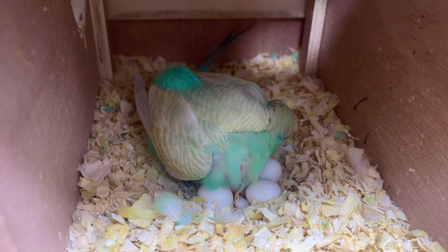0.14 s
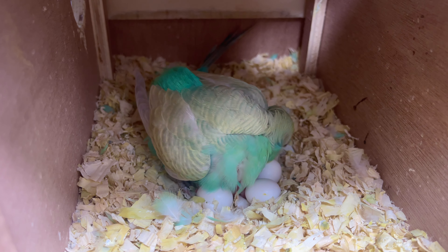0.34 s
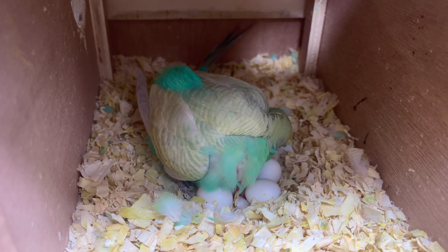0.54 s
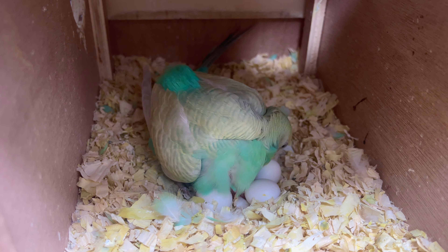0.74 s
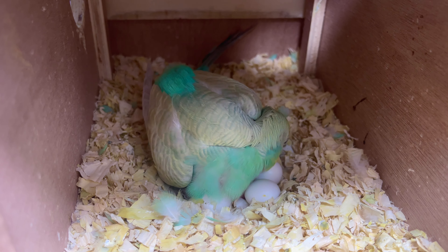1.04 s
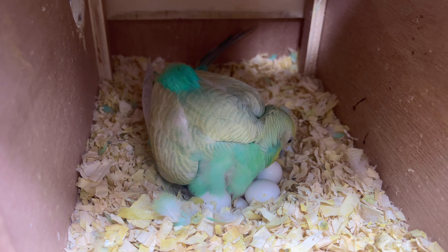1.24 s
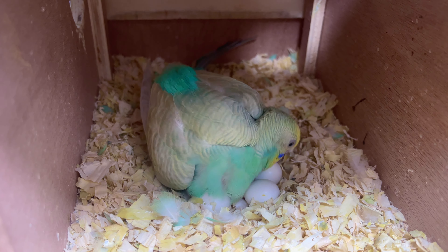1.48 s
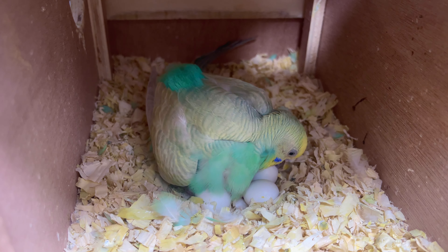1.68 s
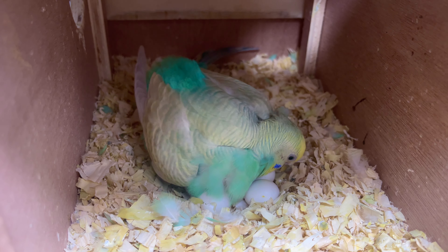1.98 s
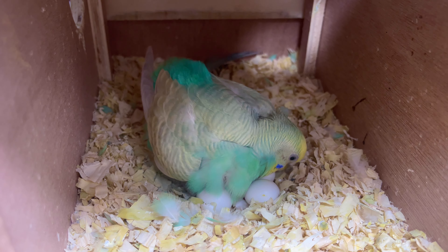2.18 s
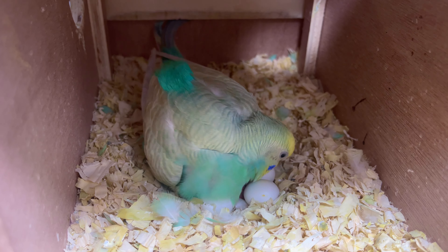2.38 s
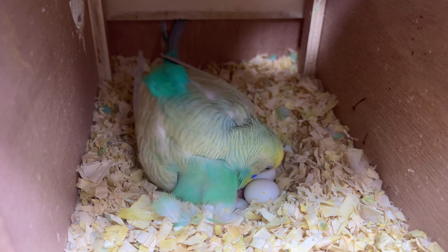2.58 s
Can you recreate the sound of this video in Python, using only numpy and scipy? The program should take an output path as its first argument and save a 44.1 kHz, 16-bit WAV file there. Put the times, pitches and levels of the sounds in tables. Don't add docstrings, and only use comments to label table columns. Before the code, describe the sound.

A small parrot gives about ten short, harsh, raspy squawks inside a wooden nest box, over low rumbling and rustling shavings; faint hatchling peeps open and close, while another bird chirps and whistles further off, miked closely in stereo.

```python
import sys
import numpy as np
from scipy import signal
from scipy.fft import rfft, irfft, next_fast_len
from scipy.io import wavfile
from scipy.ndimage import uniform_filter1d, map_coordinates

SR = 44100
rng = np.random.default_rng(int(sys.argv[2]) if len(sys.argv) > 2 else 0)


def log_audio(samples):
    frames = np.atleast_2d(samples).T
    limited = np.clip(frames, -1, 1)
    pcm = np.round(limited * 32767).astype(np.int16)
    wavfile.write(sys.argv[1], SR, pcm)


def convert_level_to_amplitude(level_db):
    exponent = np.asarray(level_db, float) / 20
    return 10 ** exponent


N = 119070

# f/Hz, level/dB
AIR_COLOUR = [(59, -30), (100, 0), (531, -4), (651, -15), (798, -6.5), (1800, -26), (2040, -33),
              (12000, -9.5), (13000, -75)]
# t/s, pitch f/Hz, level/dB
PEEPS = [
    [(.012, 4110, -40), (.024, 4200, -46), (.047, 3442, -52), (.08, 5710, -47.5), (.104, 4440, -45),
     (.11, 4500, -48), (.128, 5450, -53.5), (.137, 4500, -44.5), (.157, 5750, -48), (.176, 4465, -32.5),
     (.181, 4400, -56)],
    [(.915, 4500, -55), (.94, 5150, -42.5), (.968, 4200, -51)],
    [(1.708, 4000, -65.5), (1.72, 4000, -48), (1.735, 3470, -51), (1.775, 5260, -44)],
    [(2.54, 3750, -50), (2.558, 3900, -46), (2.578, 4500, -45.5), (2.598, 5350, -44.5), (2.62, 4640, -42),
     (2.638, 4200, -53), (2.655, 4510, -48), (2.675, 5740, -43.5), (2.71, 4040, -45)],
]
# f/Hz, level/dB
CHICK_BEAK = [(3400, -2), (4300, -12), (5300, -2), (7000, -8), (8800, -3), (10000, -13), (11300, -5)]
# t/s, level/dB
RUMBLE_LEVELS = [(0, -66), (.1, -64), (.14, -46), (.27, -41), (.47, -47), (.63, -38), (.9, -41), (1.13, -49),
                 (1.3, -43), (1.335, -70), (1.76, -72), (1.81, -47), (1.95, -41), (2.1, -40), (2.16, -58),
                 (2.3, -49), (2.41, -58), (2.44, -74)]
# f/Hz, level/dB
RUMBLE_COLOUR = [(20, -63), (40, -2.5), (80, 1.5), (197, -11.5), (378, -20), (486, -14.5), (625, -26),
                 (777, -16.5), (1200, -58), (1560, -71), (2640, -120)]
THUMP_TIMES = [.826, 1.225, 2.253, .72]
# level/dB, f/Hz, time to fade by 60 dB t/s
THUMPS = [(-4.5, 122, 0.011), (-24.5, 74.7, 0.17), (-15.5, 108, 0.047), (-31, 56.7, 0.32)]
# t/s, level/dB
RUSTLE = [(0, -81), (.12, -86), (.17, -55), (.77, -46), (1.2, -52.5), (1.42, -49), (1.56, -56), (1.78, -64),
          (1.94, -40.5), (2.04, -45), (2.14, -59.5), (2.26, -37), (2.4, -50), (2.5, -49), (2.7, -55)]
# f/Hz, level/dB
SHAVINGS = [(150, -58), (350, -2.5), (900, -15.5), (1100, -4), (2000, 0), (3500, 0), (6000, -2),
            (12000, -16.5)]
# start t/s, length t/s, level/dB, low throat f/Hz, high throat f/Hz
SQUAWKS = [
    (0.196, 0.11, -21.5, 3900, 6800),
    (0.376, 0.13, -21.5, 3700, 6450),
    (0.564, 0.13, -21, 3830, 6570),
    (0.772, .13, -26.5, 3160, 5900),
    (1.028, 0.14, -19.5, 3570, 6470),
    (1.251, 0.11, -19.5, 3800, 6260),
    (1.474, 0.093, -24.5, 4240, 6200),
    (1.773, 0.089, -20.5, 4330, 6330),
    (2.164, 0.093, -21.5, 4000, 6000),
    (2.346, 0.098, -20.5, 3560, 6430),
]
CHEST_LEVELS = [-17, -27.5, -16, -35, -15, -39, -36, -17, -3, -12]
LOW_LEVELS = [-0.5, 5.5, 1, 3.5, 3.5, 3, -1, -3.5, 0, -5]
# f/Hz, level/dB, open-beak hiss level/dB
MIDDLE_THROAT = [(5900, 9, -3.5), (5150, 3.5, -4), (4760, -3, -4.5), (3900, -17, -7), (5130, 7, -3),
                 (4400, -16, -1.5), (5480, 2, -2.5), (5150, 1, -2.5), (5000, 3.5, -4.5), (4950, 5, -2.5)]
# f/Hz, level/dB
PARROT_BEAK = [(700, -41.5), (1300, -18.5), (3000, -9), (6300, -7.5), (7600, -13), (9000, -15),
               (11800, -7.5), (15500, -22.5)]
# t/s, pitch f/Hz, level/dB
CHIRPS = [
    [(.495, 1270, -47), (.54, 1300, -46), (.595, 1340, -46)],
    [(1.008, 1280, -49), (1.018, 1250, -46), (1.03, 1240, -50)],
    [(1.21, 2450, -46), (1.225, 2250, -38), (1.255, 2500, -46)],
    [(1.365, 2750, -48), (1.39, 2800, -39), (1.415, 2550, -50)],
    [(.355, 1300, -55), (.375, 1300, -51), (.39, 1500, -55)],
    [(1.458, 1850, -55), (1.468, 1500, -50), (1.482, 1480, -54)],
]
# t/s, pitch f/Hz, level/dB
WHISTLES = [
    [(2.418, 1772, -41), (2.438, 1433, -38), (2.47, 1965, -51), (2.51, 2177, -51.5), (2.565, 2710, -40),
     (2.61, 1538, -46.5)],
    [(2.58, 4420, -45), (2.598, 3620, -49), (2.612, 3340, -47.5)],
    [(2.665, 1720, -64), (2.68, 1600, -50), (2.71, 1550, -46)],
]
# t/s, pitch f/Hz, level/dB
CHATTER = [(1.183, 3290, -46), (1.192, 2640, -41.5), (2.256, 2794, -39), (2.272, 2620, -41),
           (2.278, 1700, -43), (2.29, 2790, -47), (2.295, 3570, -44.5), (2.311, 2150, -41),
           (2.32, 1298, -42), (2.333, 1328, -47), (2.333, 2650, -44), (2.352, 1770, -46.5),
           (2.377, 1773, -37.5), (2.395, 1772, -42.5)]
# f/Hz, level/dB, time to fade by 60 dB t/s
WALL = [(410, -11.5, 0.041), (872, 7.5, 0.026), (1280, -5.5, 0.028), (1600, -2.5, 0.018)]
# f/Hz, level/dB, time to fade by 60 dB t/s
SHELL = [(749, -5, .02), (1240, -6, 0.013), (1800, -2, 0.0059), (4000, -46, 0.0054)]
# f/Hz, level/dB, time to fade by 60 dB t/s
PANEL = [(390, 6.5, 0.034), (469, -14.5, 0.22), (863, -4, 0.1)]
# f/Hz, level/dB, time to fade by 60 dB t/s
SNAP = [(4950, -8, .016), (5900, -16, .012)]
# t/s, level/dB, what rings
TAPS = [
    (1.4452, -25.5, PANEL),
    (2.415, -42.5, PANEL),
    (2.475, -47, PANEL),
    (2.556, -47.5, PANEL),
    (1.9608, -21, SNAP),
    (1.9817, -16, SNAP),
    (2.0127, -18.5, SNAP),
]
# t/s, length t/s, level/dB
SCRATCHES = [
    (1.95, .09, -52),
    (1.005, .03, -58),
]
# f/Hz, time to fade by 60 dB t/s
ROOM = [(200, 0.57), (2000, 0.23), (6000, 0.19), (12000, 0.11)]
# f/Hz, level/dB
APART = [(300, -6), (1500, 0), (3000, 2.5), (6200, -2.5), (9000, 3), (12500, 2)]
# f/Hz, width f/Hz, depth level/dB
TREBLE_DIPS = [(10200, 300, 30), (13800, 600, 45), (15300, 1500, 9)]


def unit(x):
    return x / np.sqrt(np.mean(x ** 2) + 1e-20)


def along(points, hz):
    f, v = np.transpose(points)
    return np.interp(np.log(hz + 1), np.log(f + 1), v)


def wobble(rate, size):
    knots = rng.standard_normal(int(size * rate / SR) + 4)
    return map_coordinates(knots, [np.arange(size) * rate / SR])


def filtered(x, response):
    m = next_fast_len(x.shape[-1] + 8192)
    return irfft(rfft(x, m) * response(np.fft.rfftfreq(m, 1 / SR)), m)[..., :x.shape[-1]]


def add(track, s, sound):
    part = track[max(round(s * SR), 0):][:len(sound)]
    part += sound[:len(part)]


def ring(modes, t):
    return sum(convert_level_to_amplitude(db - 60 * t / t60) * np.sin(2 * np.pi * hz * t) for hz, db, t60 in modes)


def space(x, box_db, room_db):
    hz, t, z = signal.stft(rng.standard_normal((2, SR // 2)), SR, nperseg=256)
    room = signal.istft(z * convert_level_to_amplitude(-60 * t / along(ROOM, hz)[:, None]), SR, nperseg=256)[1]
    box_t60 = .015
    box = rng.standard_normal(room.shape) * convert_level_to_amplitude(-60 * np.arange(room.shape[1]) / SR / box_t60)
    answer = convert_level_to_amplitude(room_db) * room / np.linalg.norm(room[0])
    answer += convert_level_to_amplitude([[box_db], [0]]) * box / np.linalg.norm(box[0])
    answer[0, 0] += 1
    power = uniform_filter1d(abs(rfft(answer)) ** 2, size=300)

    def spread(f):
        even = np.array([np.interp(f, np.linspace(0, SR / 2, len(p)), p ** -.5) for p in power])
        return even * [f * 0 + 1, convert_level_to_amplitude(along(APART, f))]

    wet = signal.fftconvolve(x[None], answer, axes=1)[:, :N]
    mid, side = filtered(wet, spread)
    m, d = rfft([mid, side])
    shared = uniform_filter1d((d * m.conj()).real, size=1500)
    lean = shared / (uniform_filter1d(abs(m) ** 2, size=1500) + 1e-12)
    side = side - irfft(lean * m, N)
    return np.array([mid + side, mid - side])


def still_air():
    noise = rng.standard_normal((2, N))
    return convert_level_to_amplitude(-56) * unit(filtered(noise, lambda f: convert_level_to_amplitude(along(AIR_COLOUR, f)) * (f > 60)))


def song(notes, colour, flutter_db, waver, hiss_db, count):
    out = np.zeros(N)
    for note in notes:
        s, hz, db = np.transpose(note)
        t = np.arange(s[0], s[-1], 1 / SR)
        step = np.interp(t, s, np.arange(len(s)))
        eased = np.floor(step) + np.sin(np.pi / 2 * (step % 1)) ** 2
        pitch = np.interp(eased, np.arange(len(s)), hz) * (1 + waver * wobble(157.3, size=len(t)))
        phase = 2 * np.pi * np.cumsum(pitch) / SR
        tone = convert_level_to_amplitude(hiss_db) * uniform_filter1d(rng.standard_normal(len(t)), size=3)
        for k in range(1, count + 1):
            level = along(colour, k * pitch) + flutter_db * wobble(118.8, size=len(t))
            tone += convert_level_to_amplitude(level) * np.sin(k * phase)
        loudness = convert_level_to_amplitude(np.interp(t, s, db)) * np.sqrt(2)
        add(out, s[0], loudness * tone * signal.windows.tukey(len(t), .1))
    return out


def hatchling():
    return song(PEEPS, CHICK_BEAK, flutter_db=3.5, waver=.006, hiss_db=-9, count=2)


def rumble_and_thumps():
    s, db = np.transpose(RUMBLE_LEVELS)
    noise = rng.standard_normal((2, N))
    a, b = filtered(noise, lambda f: convert_level_to_amplitude(along(RUMBLE_COLOUR, f)) * (f < 1500))
    turn = np.arccos(.7) / 2
    mid, side = np.cos(turn) * a, np.sin(turn) * b
    lag = 36
    both = np.array([mid + side, np.roll(mid - side, lag)])
    lumps = unit(convert_level_to_amplitude(3.5 * wobble(22, size=N)) * both)
    thumps, t = np.zeros(N), np.arange(SR // 6) / SR
    for at, (level_db, hz, t60) in zip(THUMP_TIMES, THUMPS):
        modes = [(hz, level_db, t60), (1.74 * hz, level_db - 6.5, 1.1 * t60)]
        add(thumps, at, ring(modes, t) * (1 - np.exp(-t / .0012)))
    rumble = lumps * convert_level_to_amplitude(5 + np.interp(np.arange(N) / SR, s, db))
    return rumble + [1.48 * thumps, np.roll(thumps, lag)]


def rustle():
    s, db = np.transpose(RUSTLE)
    uneven = convert_level_to_amplitude(3 * (wobble(250, size=N) + wobble(25, size=N)))
    grains = rng.standard_normal((2, N)) * uneven
    coloured = filtered(grains, lambda f: convert_level_to_amplitude(along(SHAVINGS, f)))
    return convert_level_to_amplitude(np.interp(np.arange(N) / SR, s, db)) * unit(coloured)


def squawks():
    pulse_hz, sag, jitter, scatter_db = 178, .06, .09, 2
    burst_s, steady, blur, breath = .0019, .5, .6, .93
    low_width, middle_width, high_width = 780, 283, 930
    slide = .015
    attack_s, release_s, swell_db, peak_per_s = .015, .026, 11, 3.185
    out, t = np.zeros(N), np.arange(SR // 5) / SR

    def peak(f, centre, width):
        return 1j * f * width / (centre * centre - f * f + 1j * f * width)

    for squawk, chest_db, low_db, middle in zip(SQUAWKS, CHEST_LEVELS, LOW_LEVELS, MIDDLE_THROAT):
        s, length, db, low_hz, high_hz = squawk
        mid_hz, mid_db, through_db = middle
        u = np.clip(t / length, 0, 1)
        turns = np.cumsum(pulse_hz * (1 - sag * u + jitter * wobble(150, size=len(t)))) / SR
        size = convert_level_to_amplitude(scatter_db * rng.standard_normal(len(t)))[turns.astype(int)]
        since = turns % 1 / pulse_hz / burst_s
        claps = np.diff(np.floor(turns), prepend=0) * size
        puff_shape = size * since * np.exp(1 - since) ** 2
        puffs = (puff_shape + steady + blur * u) * rng.standard_normal(len(t))
        air = breath * unit(puffs) + (1 - breath) * unit(claps)

        def throat(f, k):
            total = convert_level_to_amplitude(low_db) * peak(f, k * low_hz, low_width) ** 2
            total = total + convert_level_to_amplitude(5.5) * peak(f, k * high_hz, high_width) ** 2
            total = total + convert_level_to_amplitude(mid_db) * peak(f, k * mid_hz, middle_width) ** 2
            total = total + convert_level_to_amplitude(-1) * peak(f, 8502, high_width) ** 2
            total = total + convert_level_to_amplitude(chest_db) * peak(f, 2100, 810) ** 2
            return convert_level_to_amplitude(along(PARROT_BEAK, f)) * (total - convert_level_to_amplitude(through_db - 10.5))

        early = filtered(air, lambda f: throat(f, 1 + slide))
        late = filtered(air, lambda f: throat(f, 1 - slide))
        edges = np.clip(np.minimum(t / attack_s, (length - t) / release_s), 0, 1)
        swell = convert_level_to_amplitude(db + 3 - 3.85 * swell_db * (u - peak_per_s * length) ** 2)
        add(out, s, edges * swell * unit((1 - u) * early + u * late))
    return out


def far_bird():
    syllable_s, fall = .018, .041
    syllables = [[(s, hz * (1 + fall), db), (s + syllable_s, hz * (1 - fall), db)] for s, hz, db in CHATTER]
    plain = [(1, 0)]
    chirps = song(CHIRPS, plain, flutter_db=2, waver=.018, hiss_db=-26, count=1)
    chatter = song(syllables, plain, flutter_db=5, waver=.08, hiss_db=-7, count=1)
    whistles = song(WHISTLES, plain, flutter_db=4, waver=.03, hiss_db=-40, count=1)
    return chirps + chatter + whistles


def scratch(out, s, length, db):
    when, pitch, size = rng.random((400, 3))[:int(4400 * length)].T
    hz = 5400 * convert_level_to_amplitude(9 * (pitch - .36))[:, None]
    cycles = np.arange(300) / SR * hz
    level = convert_level_to_amplitude(db - 2.5 * np.log(size + .00048))[:, None]
    grains = np.sin(2 * np.pi * cycles) * (1 - np.exp(-cycles)) * np.exp(-cycles / 5) * level
    at = ((s + when * length) * SR).astype(int)[:, None] + np.arange(300)
    out += np.bincount(at.ravel(), grains.ravel(), N + SR)[:N]


def taps():
    out, t = np.zeros(N), np.arange(SR // 8) / SR
    for s, length, db in SCRATCHES:
        scratch(out, s, length, db)
    add(out, 1.44, convert_level_to_amplitude(-30) * ring(WALL, t) * (1 - np.exp(-t / .0007)))
    click = 1.17 * convert_level_to_amplitude(-60 * t / .012) * rng.standard_normal(len(t))
    add(out, 1.931, convert_level_to_amplitude(-17) * (ring(SHELL, t) + click))
    for s, db, modes in TAPS:
        add(out, s, convert_level_to_amplitude(db) * ring(modes, t) * (1 - np.exp(-t / .0012)))
    return out


def scene():
    mix = still_air()
    mix = mix + space(hatchling(), box_db=-4, room_db=-14)
    mix = mix + rumble_and_thumps() + rustle()
    mix = mix + space(squawks(), box_db=-5, room_db=-6.5)
    mix = mix + space(far_bird(), box_db=0, room_db=-8)
    return mix + space(taps(), box_db=-4, room_db=-14)


def low_pass(x):
    return signal.sosfilt(signal.butter(12, 16790, fs=SR, output="sos"), x)


def record(dry):
    def treble_response(f):
        depth = sum(db * np.exp(-((f - hz) / width) ** 2) for hz, width, db in TREBLE_DIPS)
        return convert_level_to_amplitude(-depth) * np.clip((16200 - f) / 600, 0, 1)

    fade = np.clip(np.arange(N) / SR / .04, 0, 1) ** 1.5
    mix = fade * filtered(dry, treble_response)
    return low_pass(mix)


dry = scene()
out = record(dry)
log_audio(out)
```